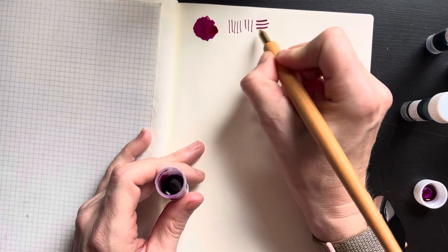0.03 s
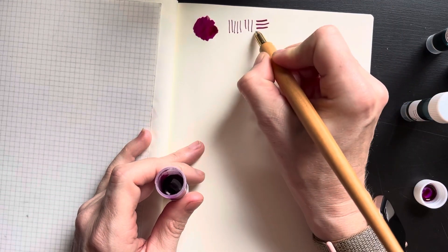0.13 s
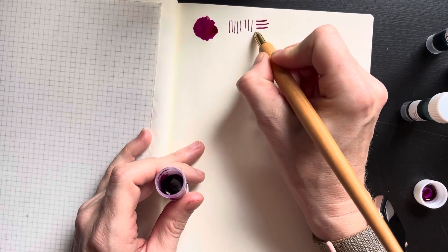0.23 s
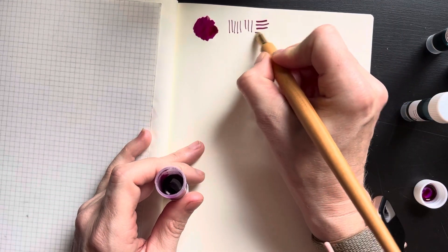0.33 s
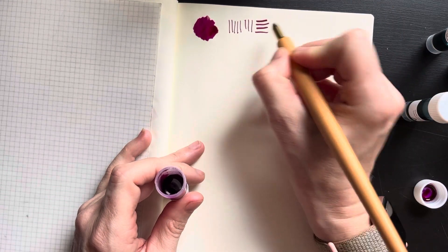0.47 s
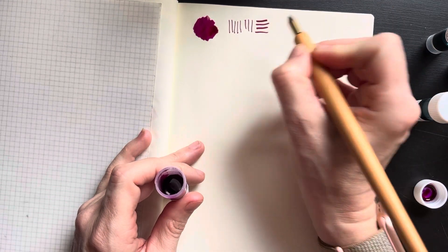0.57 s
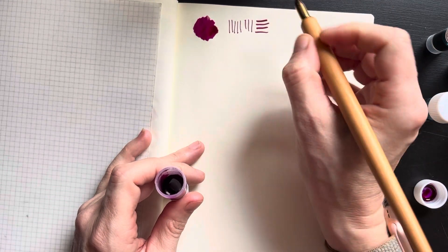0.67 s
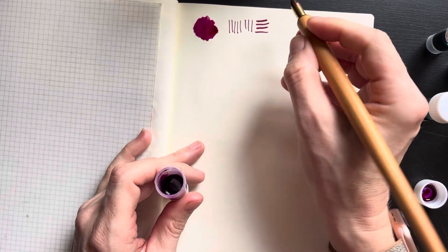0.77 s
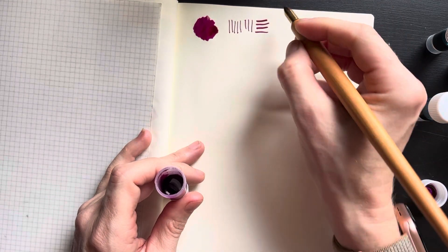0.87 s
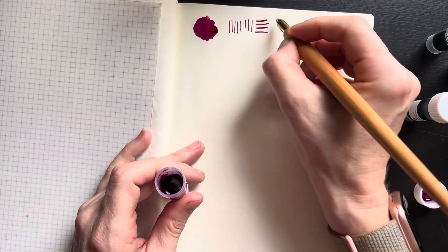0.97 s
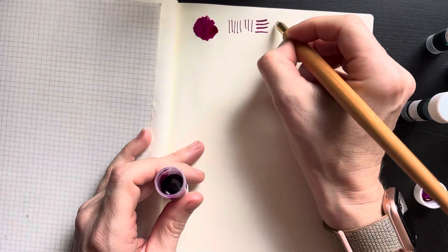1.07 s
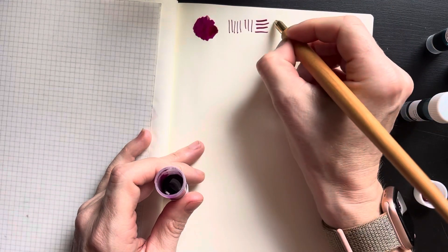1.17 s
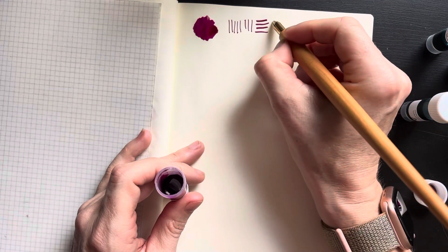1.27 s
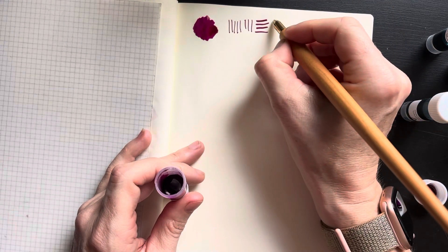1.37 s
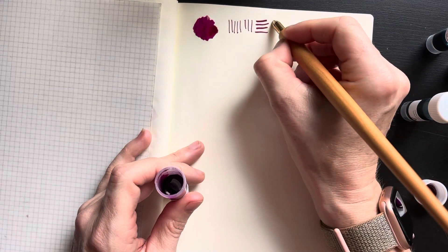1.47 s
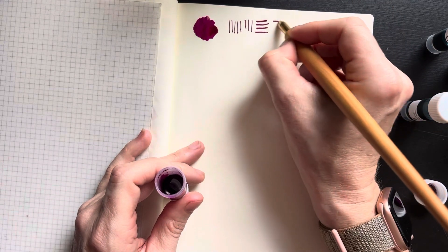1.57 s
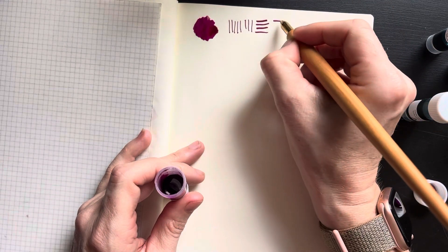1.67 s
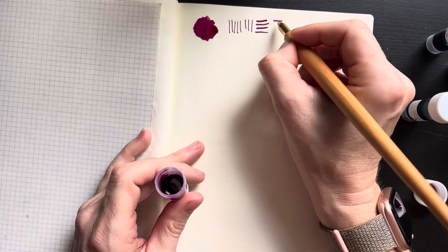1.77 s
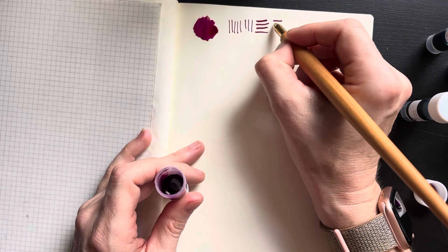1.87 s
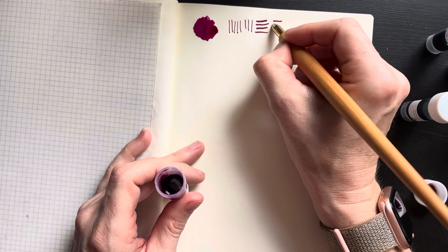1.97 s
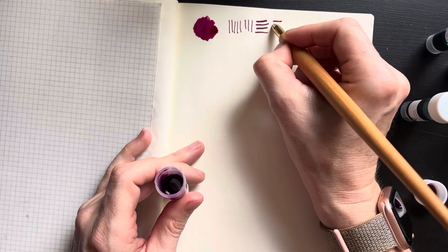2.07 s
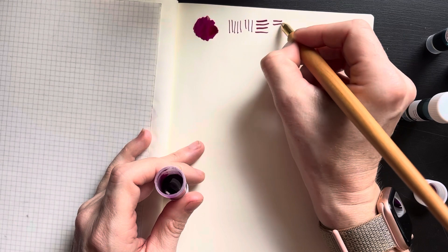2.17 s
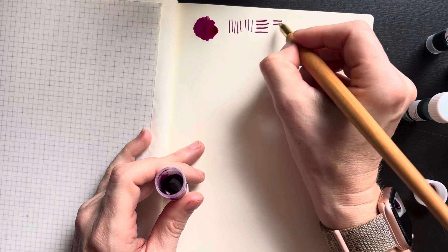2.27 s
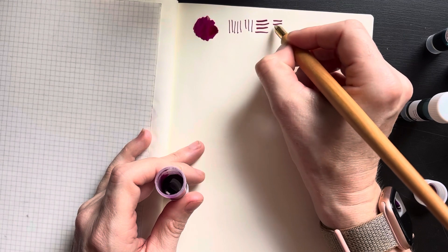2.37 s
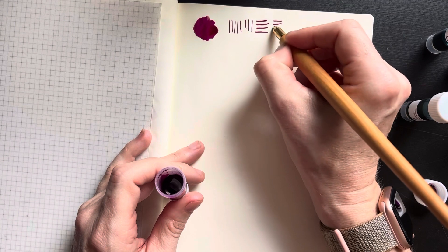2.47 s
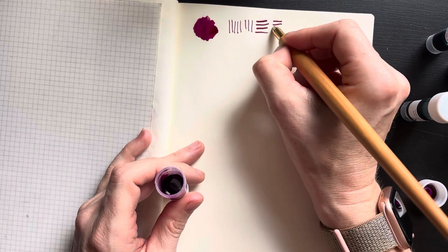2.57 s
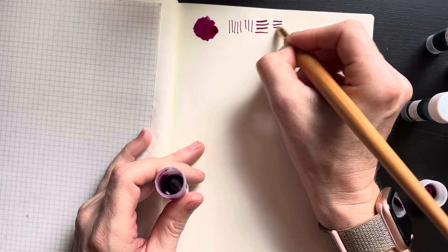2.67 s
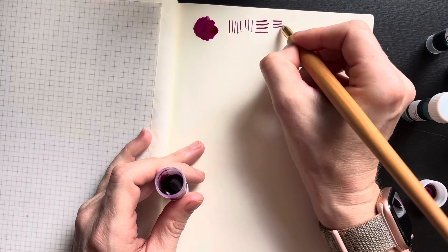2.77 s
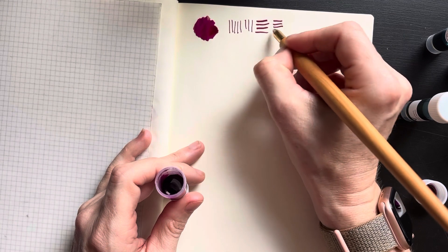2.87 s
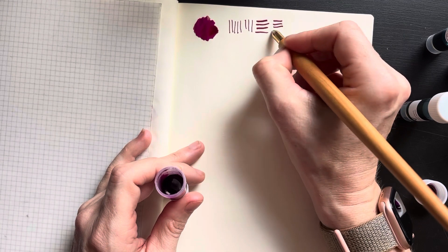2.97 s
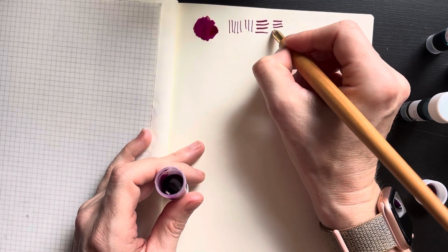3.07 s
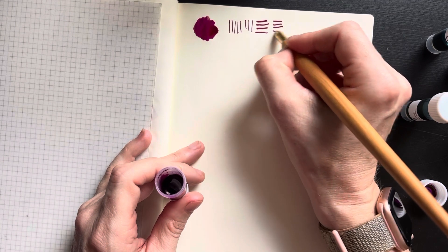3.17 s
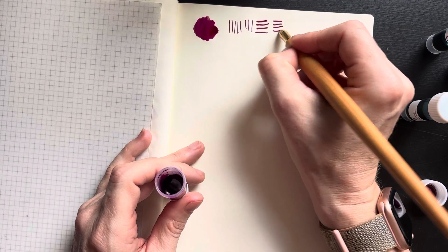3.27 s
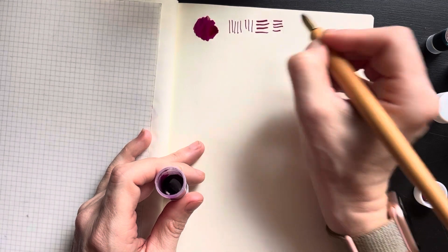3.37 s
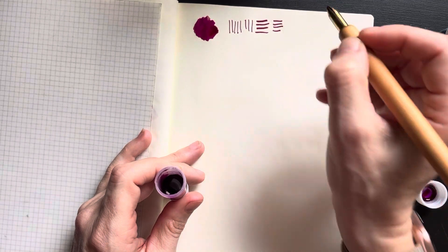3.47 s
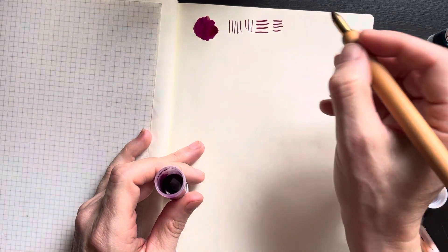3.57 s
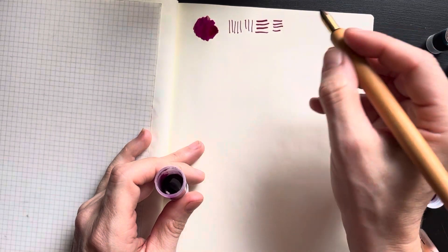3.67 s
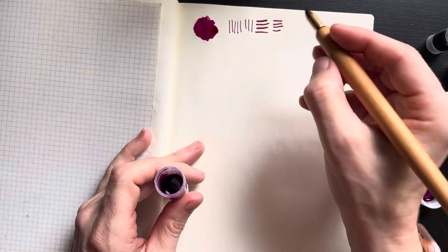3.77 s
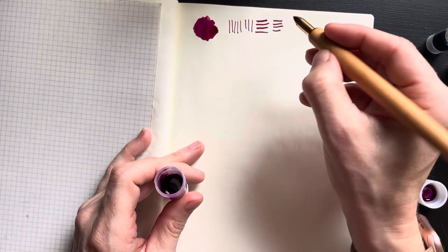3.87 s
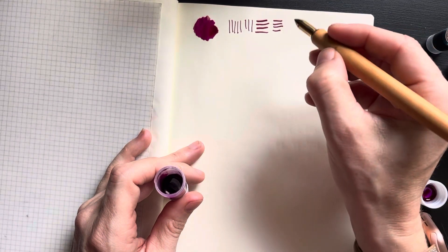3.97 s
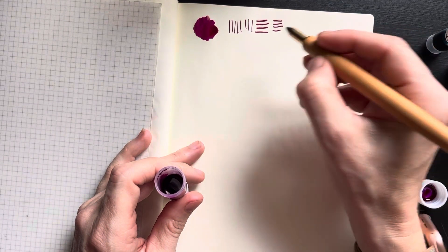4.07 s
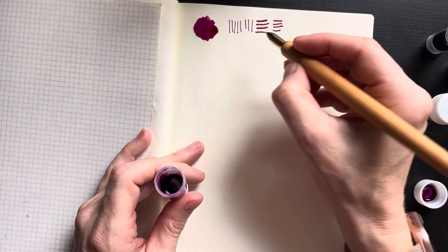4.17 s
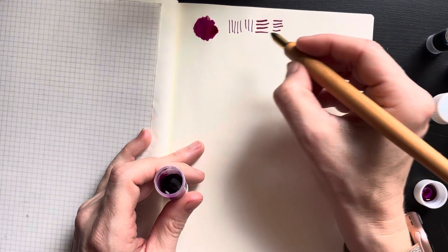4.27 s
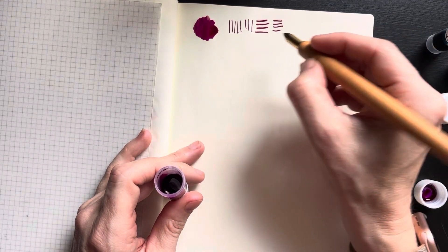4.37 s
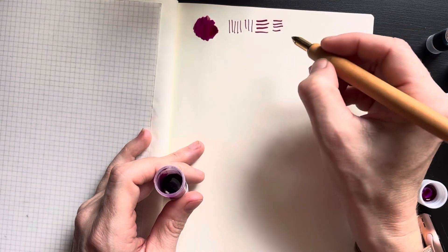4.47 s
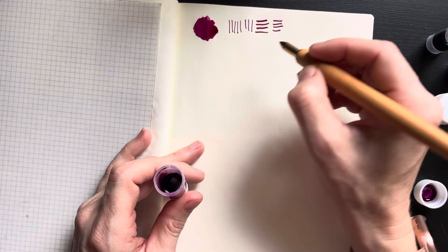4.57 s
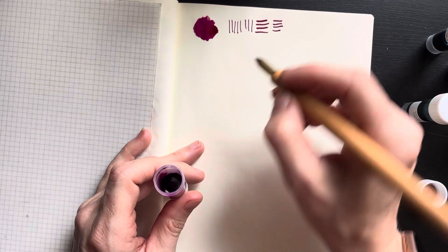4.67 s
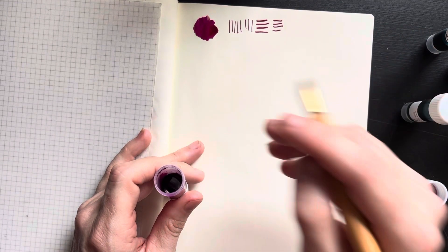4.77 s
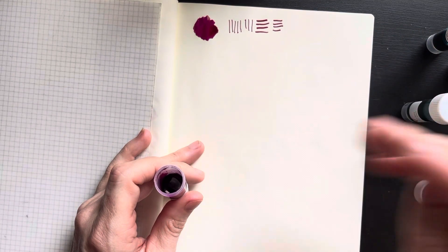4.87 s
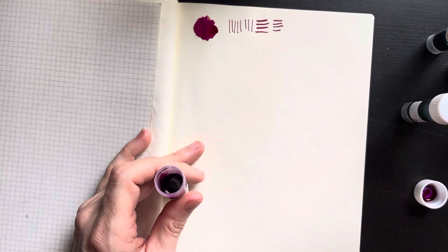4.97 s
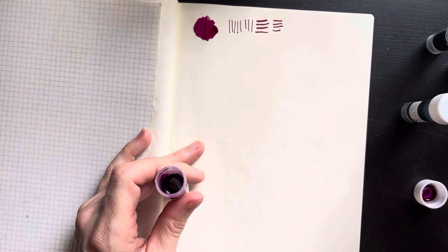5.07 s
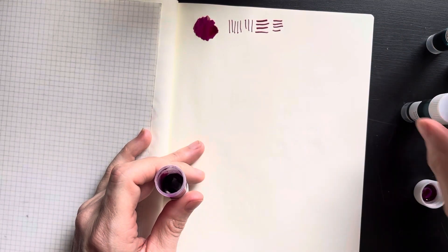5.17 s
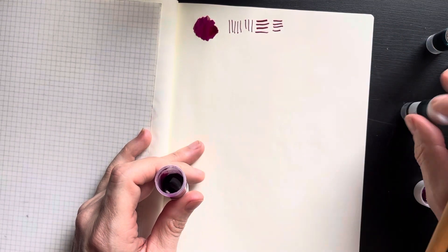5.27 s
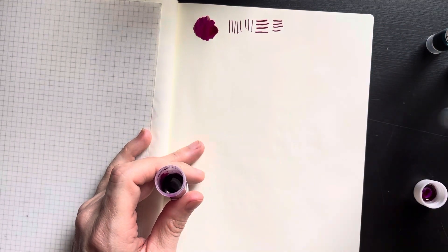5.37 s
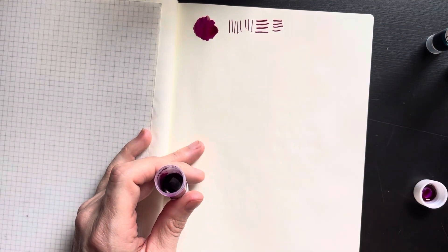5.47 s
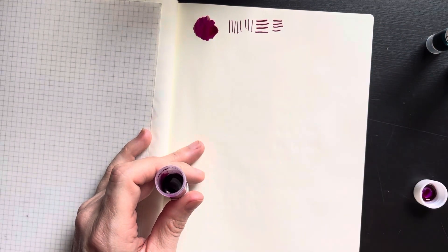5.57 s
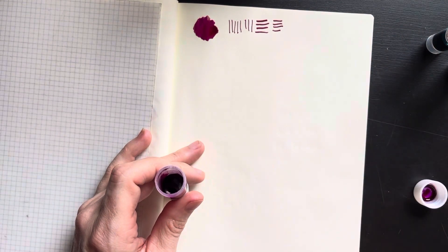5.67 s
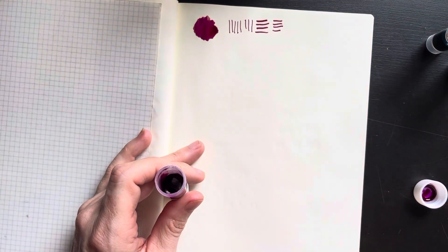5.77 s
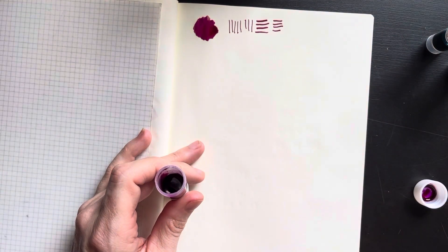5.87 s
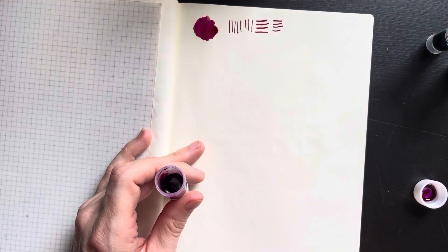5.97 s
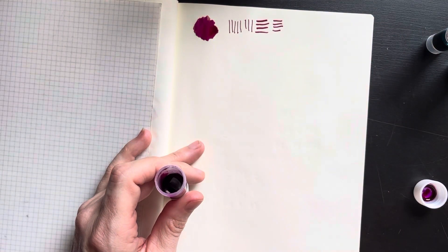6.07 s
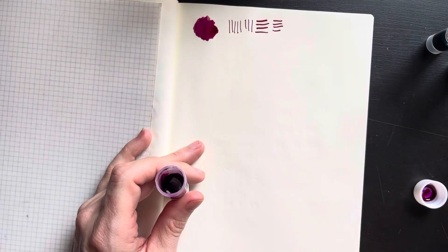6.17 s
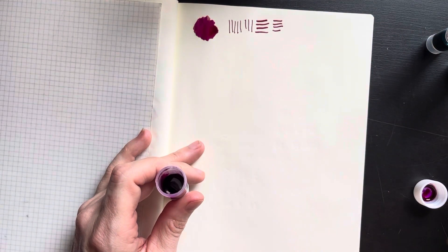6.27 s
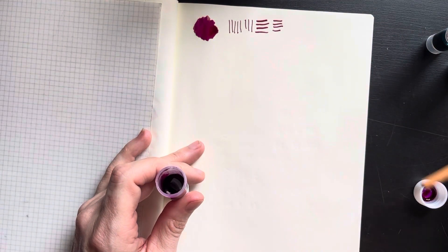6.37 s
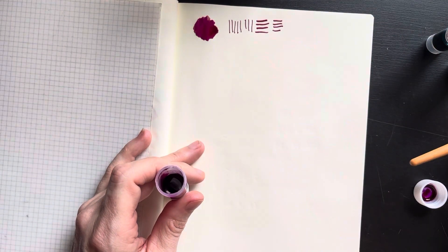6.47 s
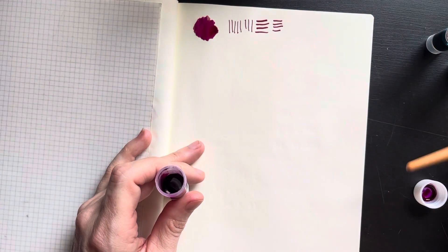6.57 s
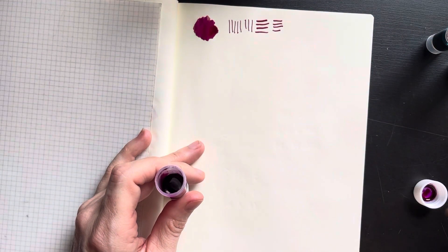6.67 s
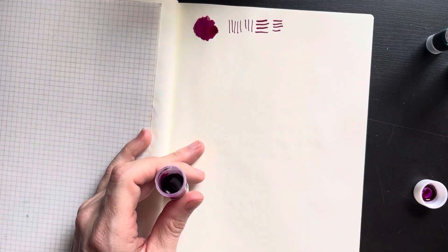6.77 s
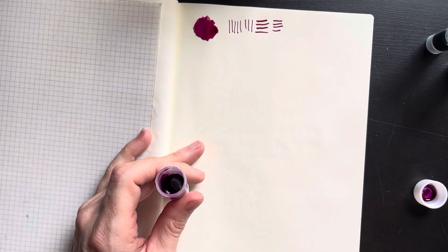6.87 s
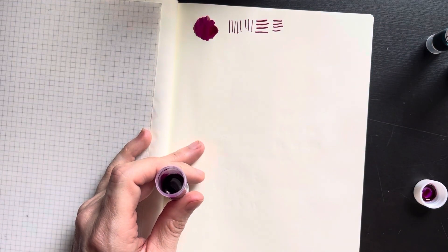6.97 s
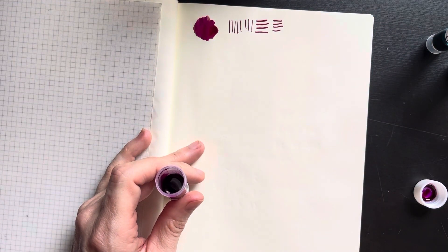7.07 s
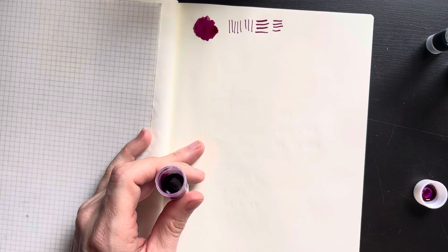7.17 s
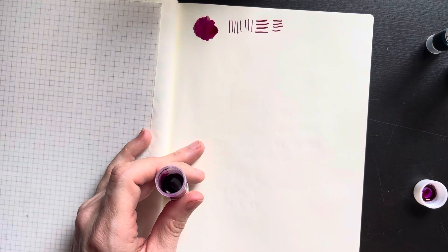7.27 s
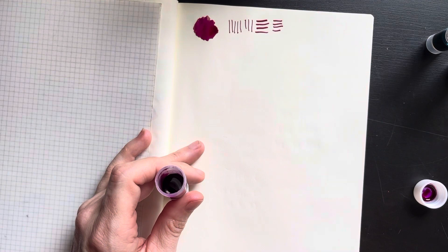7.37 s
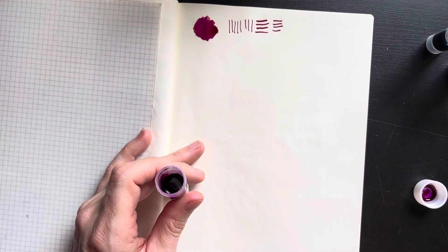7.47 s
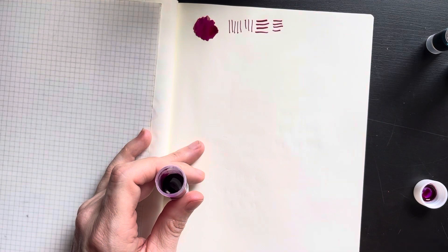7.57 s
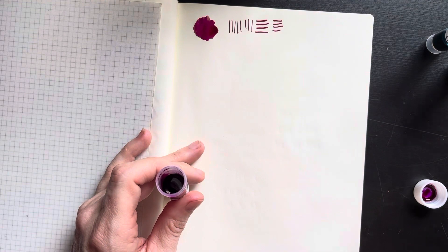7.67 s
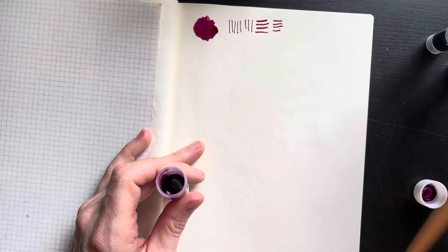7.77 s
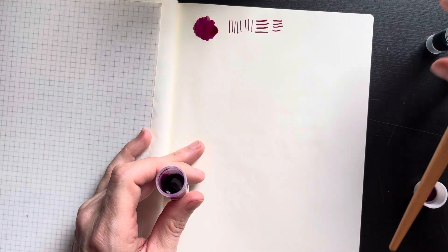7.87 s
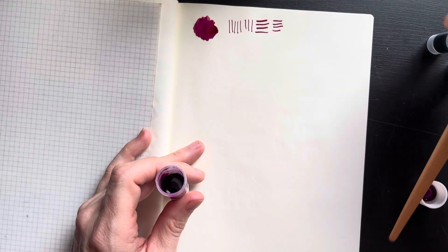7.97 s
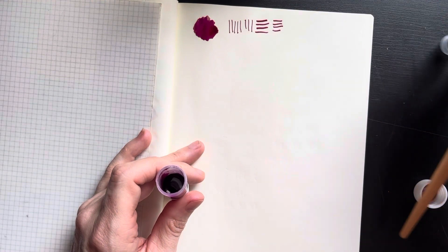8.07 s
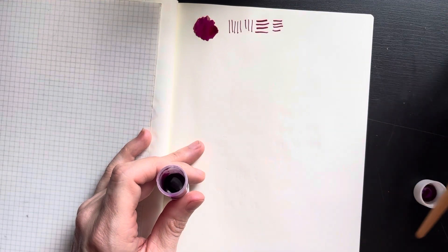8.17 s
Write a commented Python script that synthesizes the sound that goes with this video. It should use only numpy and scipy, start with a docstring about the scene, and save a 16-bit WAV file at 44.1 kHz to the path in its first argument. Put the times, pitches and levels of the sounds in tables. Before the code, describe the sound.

Quick ringing nib scratches on a notebook page, a hand brushing paper, then desk knocks, a juddering slide and light clatter in a quiet room.

```python
"""A steel dip pen draws five quick short lines in a notebook on a wooden desk, in a small quiet room.
Paper fibres pluck its ringing nib; after the first stroke and after the last the hand hisses over the page.
Soft bumps and light clicks come mostly after the writing; things scrape, a small ink bottle lands and wobbles to rest.
Something slides with a gliding judder, a round thing rocks in fading nudges, and the pen clatters on the desk.
Low rumble and faint airy hiss run throughout; short room reflections follow every other sound."""
import sys
import numpy as np
from scipy import signal
from scipy.fft import rfft, irfft, next_fast_len
from scipy.io import wavfile

SR = 44100
rng = np.random.default_rng(int(sys.argv[2]) if len(sys.argv) > 2 else 0)


def waveform_to_disk(signal):
    """Save audio, clipped to [-1, 1], as 16-bit WAV at the path in sys.argv[1]."""
    frames = np.transpose(np.atleast_2d(signal))
    scaled = np.clip(frames, -1, 1) * 32767
    samples = np.round(scaled).astype(np.int16)
    wavfile.write(sys.argv[1], SR, samples)


N = 362218
TIME = np.arange(N) / SR  # s
BLOW = TIME[:SR // 5]  # time within one blow, s


def from_db(db):
    """Turn decibels into gain."""
    return 10 ** (np.asarray(db) / 20)


def rms_one(x):
    """Scale to unit power."""
    return x / np.sqrt(np.mean(x ** 2) + 1e-30)


def blow_one(x):
    """Scale a blow to unit power over its first 20 ms."""
    return x / np.sqrt(np.mean(x[..., :SR // 50] ** 2) + 1e-30)


def at_hz(points, hz):
    """Read a table at any frequency, on a log-frequency axis."""
    known_hz, values = np.transpose(points)
    return np.interp(np.log(np.maximum(hz, 1)), np.log(known_hz), values)


def coloured(x, spectrum):
    """Shape a sound to a spectrum that falls away steeply past both ends; unit power."""
    length = x.shape[-1]
    size = next_fast_len(length)
    hz = np.fft.rfftfreq(size, 1 / SR) + 1
    ends = np.minimum(1, np.minimum(hz / spectrum[0][0], spectrum[-1][0] / hz)) ** 4
    shaped = irfft(rfft(x, size) * from_db(at_hz(spectrum, hz)) * ends, size)
    return rms_one(shaped[..., :length])


def resonate(x, modes):
    """Ring several resonances side by side, with alternating sign."""
    out = 0
    for k, (hz, width, db) in enumerate(modes):
        r = np.exp(-np.pi * width / SR)  # a wider resonance dies sooner
        poles = [1, -2 * r * np.cos(2 * np.pi * hz / SR), r * r]
        ring = (1 - r * r) / 2 * signal.lfilter([1, 0, -1], poles, x)
        out = out + (-1) ** k * from_db(db) * ring
    return out


def grains(per_s, spread_db):
    """Tiny catches of rubbing surfaces: clicks at random times, of uneven size and random sign."""
    sizes = from_db(spread_db * np.minimum(rng.exponential(1, N), 4))
    signs = rng.choice([-1, 1], N)
    present = rng.random(N) < per_s / SR
    return sizes * signs * present + 1e-18


def flutter(depth_db, top_hz):
    """Make a gain of unit power that wavers at random, as grip comes and goes."""
    wobble = coloured(rng.standard_normal(N), [(12, 0), (top_hz, -8)])
    return rms_one(from_db(depth_db * np.clip(wobble, -2, 2)))


def gestures(rows, column, rise, late_s=0):
    """Level of sliding motions that speed up and slow down in a lopsided bell shape."""
    level = np.zeros(N)
    for row in rows:
        s, length = row[:2]
        near = slice(max(0, int((s - 4 * length) * SR)), int((s + 4 * length) * SR))
        t = TIME[near] - s - late_s
        spread = length * np.where(t < 0, rise, 1 - rise)
        level[near] += from_db(row[column]) * np.exp(-.5 * (t / spread) ** 2)
    return level


def add(track, s, sound):
    """Mix a sound in at a time."""
    start = round(s * SR)
    part = sound[..., :N - start]
    track[..., start:start + part.shape[-1]] += part


def dying_run(start_s, first_gap_s, shrink, count):
    """Times of touches whose gaps shrink by a fixed share."""
    gaps = first_gap_s * shrink ** np.arange(count - 1)
    return start_s + np.append(0, np.cumsum(gaps))


# spectrum of the building's rumble: [f/Hz, level/dB per Hz]
RUMBLE_SPECTRUM = [(15, -37), (25, -11), (40, -5), (58, -2), (72, -3), (86, -21), (101, -7.5), (119, -8.5),
                   (134, -7.5), (171, -30.5), (186, -16), (204, -17), (259, -15.5), (332, -34.5),
                   (420, -38), (550, -58.5), (920, -120)]
# spectrum of the airy hiss: [f/Hz, level/dB per Hz]
AIR_SPECTRUM = [(200, -7), (350, 10.5), (480, 11), (700, -2.5), (1000, -5.5), (1400, -2.5), (2000, -10),
                (4500, -15.5), (8000, -17.5), (12000, -25), (16000, -30.5)]
RUMBLE_DB, AIR_DB = -59.5, -78


def background():
    """The low rumble of the building, nearly alike on both sides, and a faint airy hiss."""
    shared = coloured(rng.standard_normal(N), RUMBLE_SPECTRUM)
    difference = coloured(rng.standard_normal(N), RUMBLE_SPECTRUM) * [[1], [-1]]
    rumble = shared + from_db(-18.5) * difference
    air = coloured(rng.standard_normal((2, N)) + .5 * rng.standard_normal(N), AIR_SPECTRUM)
    return from_db(RUMBLE_DB) * rumble + from_db(AIR_DB) * air


# pen strokes: [t/s of top speed, length/s of the bell, nib level/dB, page drum level/dB]
PEN_STROKES = [(0.381, 0.035, -53.5, -47.5), (1.572, 0.046, -63.5, -55.5), (2.105, 0.036, -65, -55),
               (2.661, 0.039, -63.5, -52), (3.168, 0.031, -63, -50)]
# resonances of the steel nib: [f/Hz, width/Hz, level/dB]
NIB_RESONANCES = [(1040, 137, -0.5), (1350, 48, -2), (1800, 330, -14), (2360, 143, -1.5), (4027, 214, -1.5),
                  (6430, 57, 2.5), (7500, 530, -12), (9100, 250, -15), (11720, 160, -11)]
# hiss of the paper fibres: [f/Hz, level/dB per Hz]
FIBRE_SPECTRUM = [(700, -13), (1500, 7), (3000, 1), (7000, -23), (10000, -8), (15500, 4)]
# the drumming page: [f/Hz, level/dB per Hz]
PAGE_SPECTRUM = [(90, -7), (180, -16), (260, 4.5), (340, -7.5), (450, -12), (720, -14.5), (900, -35),
                 (1500, -34), (3000, -70)]
STROKE_RISE = 0.43  # share of the bell spent speeding up
FIBRE_DB = -10  # fibre hiss against the ring of the nib


def nib():
    """Fibres pluck the steel tines; the page drums underneath, its swell a little late."""
    catches = grains(per_s=6000, spread_db=2.0) * flutter(depth_db=-1.5, top_hz=255)
    page = coloured(catches, PAGE_SPECTRUM)
    # the tines bite harder each time the page springs up
    plucks = catches * from_db(1.5 * np.clip(page, -2, 2))
    hiss = from_db(FIBRE_DB) * coloured(plucks, FIBRE_SPECTRUM)
    ring = rms_one(resonate(plucks, NIB_RESONANCES))
    nib_level = gestures(PEN_STROKES, -2, STROKE_RISE)
    page_level = gestures(PEN_STROKES, -1, STROKE_RISE, late_s=0.0077)
    return (hiss + ring) * nib_level + page * page_level


# low resonances of the desk top: [f/Hz, width/Hz, level/dB]
DESK_LOW = [(119, 58, -12.5), (257.4, 34, -1), (290.7, 78, -3.5), (346, 55, -5), (482.5, 37, -2),
            (553, 47, -11), (645, 29, -12), (711, 48, -10.5)]
# high resonances of the desk top: [f/Hz, width/Hz, level/dB]
DESK_HIGH = [(904, 34, -11.5), (963.4, 18, 1), (1010, 94, -3), (1245, 84, -8.5), (1397, 78, 0.5),
             (1527, 120, -3), (1848, 210, -13), (2190, 160, -15.5), (2470, 68, -4.5), (2885, 360, -12)]


def desk(modes, travel_s, build_s, apart):
    """The struck desk top; bending waves are slower the lower they are, so low notes come later."""
    out = 0
    for k, (hz, width, db) in enumerate(modes):
        t = np.maximum(BLOW - travel_s * np.sqrt(modes[0][0] / hz), 0)
        # each blow stirs every resonance a little differently
        strength = width * from_db(db + 1.5 * rng.standard_normal())
        envelope = (1 - np.exp(-t / build_s)) * np.exp(-np.pi * width * t)
        # short waves meet the two microphones at different phases
        shift = min(apart * hz / 1000, np.pi / 4)
        phase = (-1) ** (k // 2) * np.array([[1], [-1]]) * shift
        out = out + (-1) ** k * strength * envelope * np.sin(2 * np.pi * hz * t + phase)
    return blow_one(out)


def snap(spectrum, rise_s, decay_s, after_db, after_s):
    """A sharp contact: a short burst, then fainter scatter from nearby surfaces."""
    fall = np.exp(-BLOW / decay_s) + from_db(after_db) * np.exp(-BLOW / after_s)
    envelope = (1 - np.exp(-BLOW / rise_s)) * fall
    return coloured(rng.standard_normal(len(BLOW)), spectrum) * envelope


# rattle and chafing on the desk: [f/Hz, level/dB per Hz]
RATTLE_SPECTRUM = [(150, -14.5), (260, 0.5), (400, -2), (490, 4.5), (640, 0.5), (830, -0.5), (1000, 0),
                   (1400, -7.5), (1800, -22), (2700, -26.5), (3600, -30.5), (5200, -34), (8500, -42),
                   (13000, -45)]


def soft_contact(hz, clack_db, push_s):
    """A soft contact pushes slowly, so the wood answers mostly around one low pitch."""
    swell = BLOW / push_s
    thud = swell * np.exp(1 - swell) * np.sin(2 * np.pi * hz * BLOW)
    wood = desk(DESK_LOW[1:], travel_s=.0012, build_s=0.011, apart=0.35)
    clack = desk(DESK_HIGH, travel_s=0.000862, build_s=0.0032, apart=0.75)
    chafe = snap(RATTLE_SPECTRUM, rise_s=0.45 * push_s, decay_s=1.7 * push_s, after_db=-10.5, after_s=0.018)
    body = from_db(0.5) * thud + from_db(-10.0) * wood
    return body + from_db(clack_db - 13.0) * clack + from_db(clack_db + 8) * chafe


# soft bumps of handling, before soft_contact's trims: [t/s, level/dB, f/Hz, clack level/dB]
HANDLING_BUMPS = [(0.459, -49.5, 302, -69), (4.082, -45, 308, -76), (4.134, -44, 336, -73),
                  (4.18, -42, 449, -67), (4.492, -52, 350, -76), (5.257, -47.5, 515, -67.5),
                  (5.27, -37, 636, -50.5), (5.445, -44, 422, -61.5), (5.59, -44, 366, -64),
                  (6.066, -47, 470, -59), (6.18, -38, 326, -56), (6.282, -40.5, 301, -54.5),
                  (6.863, -53.5, 400, -66.5), (7.988, -39.5, 556, -61)]
PUSH_S = 0.003  # time the push takes to peak


def bumps():
    """Fingers and things in them bump the desk, each with a soft thud at its own pitch."""
    out = np.zeros((2, N))
    for s, db, hz, clack_db in HANDLING_BUMPS:
        add(out, s, from_db(db) * soft_contact(hz, clack_db - db, PUSH_S))
    return out


# the hand brushing the page, before the trims: [t/s of top speed, length/s, hiss level/dB, rasp level/dB]
HAND_BRUSHES = [(0.511, 0.06, -60, -66.5), (0.72, 0.22, -85, -95), (3.319, 0.028, -57.5, -62.5),
                (3.72, 0.44, -90, -102), (4.755, 0.09, -71, -75), (4.85, 0.075, -70.5, -86),
                (4.965, 0.035, -75, -92), (7.56, 0.12, -76.5, -84.5)]
# fine hiss of skin: [f/Hz, level/dB per Hz]
SKIN_HISS_SPECTRUM = [(3000, -16), (3800, -3), (4200, -10), (4700, -10), (6500, -6), (7600, -1.5),
                      (8700, 5), (10000, -12.5), (12000, 4.5), (13500, -10), (15500, -0.5)]
# lower rasp of pressed skin: [f/Hz, level/dB per Hz]
SKIN_RASP_SPECTRUM = [(100, -21), (280, 22.5), (450, 10), (800, -1.5), (2000, 1.5), (2800, -5.5), (4000, 1),
                      (5200, -5.5), (8000, -14)]
BRUSH_RISE = 0.26  # share of the bell spent speeding up


def hand():
    """Skin on paper: a fine hiss, with a lower rasp where it presses."""
    hiss = coloured(grains(per_s=7000, spread_db=0.5), SKIN_HISS_SPECTRUM)
    hiss = hiss * gestures(HAND_BRUSHES, -2, BRUSH_RISE)
    rasp = coloured(grains(per_s=4800, spread_db=1.0), SKIN_RASP_SPECTRUM)
    rasp = rasp * gestures(HAND_BRUSHES, -1, BRUSH_RISE)
    return (from_db(-1.5) * hiss + from_db(9.0) * rasp) * flutter(depth_db=2.5, top_hz=118)


# light clicks of small things in the hand, before the trims: [t/s, level/dB]
SMALL_CLICKS = [(3.2897, -57), (5.0838, -65.5), (5.441, -47), (6.071, -54.5), (6.109, -57), (6.626, -62),
                (6.969, -32), (7.9855, -60.5)]
# resonances of the small parts: [f/Hz, width/Hz, level/dB]
CLICK_RESONANCES = [(1220, 110, -6.5), (2000, 95, 0.5), (2410, 110, -0.5), (3145, 210, 5), (4145, 89, 5),
                    (7200, 170, 2)]
# the first snap of a click: [f/Hz, level/dB per Hz]
CLICK_SPECTRUM = [(800, 1.5), (2000, 0), (6000, 0), (11000, -2), (13500, -5.5), (16000, -15)]


def clicks():
    """Small hard parts snap together and ring briefly."""
    out = np.zeros(N)
    for s, db in SMALL_CLICKS:
        contact = snap(CLICK_SPECTRUM, rise_s=.0006, decay_s=.003, after_db=-17, after_s=.02)
        ring = blow_one(resonate(contact, CLICK_RESONANCES))
        add(out, s, from_db(db) * (from_db(-1.5) * contact + from_db(-13.5) * ring))
    return out


def scrape():
    """A dragged thing sticks and slips, sending uneven little jolts into the desk."""
    slips = grains(per_s=2100, spread_db=2.5)
    wood = rms_one(resonate(slips, DESK_LOW[1:] + DESK_HIGH))
    return from_db(-1.0) * coloured(slips, RATTLE_SPECTRUM) + from_db(-9.0) * wood


# things dragged a little way over the desk: [t/s of top speed, length/s of the bell, level/dB]
SHORT_DRAGS = [(5.277, 0.02, -50.5), (5.862, 0.0091, -28), (5.893, 0.029, -41), (6.838, 0.015, -65.5),
               (7.394, 0.026, -60.5), (8.02, 0.04, -66)]
DRAG_RISE = 0.46  # share of the bell spent speeding up


def drags():
    """Short stick-slip scrapes as things are shifted."""
    return scrape() * gestures(SHORT_DRAGS, -1, DRAG_RISE)


# the pen on the desk, before the trims: [t/s, crack level/dB, thump level/dB, clack level/dB]
PEN_CLATTER = [(7.2971, -39.5, -40.5, -56), (7.3331, -49, -42, -54.5), (7.3644, -45.5, -30.5, -30),
               (7.3824, -65, -43, -35)]
# sharp crack of a hard landing: [f/Hz, level/dB per Hz]
CRACK_SPECTRUM = [(2500, -25.5), (4200, -16.5), (5300, 6), (6200, 2.5), (7200, 1), (8700, -0.5),
                  (12000, -5.5), (14000, -12), (16000, -20)]
# duller rap of the thing that lands: [f/Hz, level/dB per Hz]
RAP_SPECTRUM = [(1200, -9.5), (1800, 8.5), (2300, 3), (2800, 4), (3500, -2.5), (4300, -12.5), (5200, -14),
                (6500, -22)]
# the bottle: each rebound comes sooner and weaker; TOUCHES includes the landing
LANDING_S, FIRST_REBOUND_S, REBOUND_SHRINK, TOUCHES = 5.6406, 0.105, 0.615, 7
# crack, thump, clack, rap: level/dB at the landing (before the trims) and loss/dB per rebound
LANDING_DB = (-17, -17.5, -21, -34.5)
REBOUND_LOSS_DB = (5, 3.5, 3.6, 2.8)
PEN_RAP_DB = -4  # rap of the wooden holder against the thump, before the trims


def knocks():
    """Each hard landing cracks in the air, sets the desk ringing and shakes what lies on it."""
    landings = []
    for k, s in enumerate(dying_run(LANDING_S, FIRST_REBOUND_S, REBOUND_SHRINK, TOUCHES)):
        landings.append((s, *(np.array(LANDING_DB) - k * np.array(REBOUND_LOSS_DB))))
    for s, crack_db, thump_db, clack_db in PEN_CLATTER:
        landings.append((s, crack_db, thump_db, clack_db, thump_db + PEN_RAP_DB))
    out = np.zeros((2, N))
    for s, crack_db, thump_db, clack_db, rap_db in landings:
        crack = snap(CRACK_SPECTRUM, rise_s=0.000067, decay_s=0.00062, after_db=-12, after_s=0.0037)
        rap = snap(RAP_SPECTRUM, rise_s=0.003, decay_s=0.0028, after_db=-14.5, after_s=0.021)
        thump = desk(DESK_LOW, travel_s=0.0041, build_s=0.0031, apart=0.56)
        clack = desk(DESK_HIGH, travel_s=.003, build_s=0.0021, apart=0.9)
        rattle = snap(RATTLE_SPECTRUM, rise_s=0.0021, decay_s=0.013, after_db=-18.5, after_s=0.056)
        add(out, s + .0021, from_db(crack_db) * crack)
        add(out, s + .001, from_db(rap_db + 11.0) * rap)
        add(out, s, from_db(thump_db - 1.0) * thump)
        add(out, s, from_db(clack_db - 4.5) * clack)
        add(out, s + .003, from_db(clack_db - 1.5) * rattle)
    return out


# judder rate of one slide in two pushes, before its flutter: [t/s, f/Hz (slips per s)]
JUDDER_RATE = [(6.365, 610), (6.388, 273), (6.42, 325), (6.452, 380), (6.47, 530), (6.495, 600),
               (6.52, 490), (6.55, 261)]
# how hard it bears on the desk, before the trims: [t/s, judder level/dB, scrape level/dB]
SLIDE_PRESSURE = [(6.345, -74, -81), (6.353, -70, -81), (6.369, -37.5, -54), (6.385, -41.5, -53.5),
                  (6.393, -35, -62), (6.421, -42.5, -69), (6.429, -55.5, -50), (6.469, -33, -57.5),
                  (6.491, -51, -56.5), (6.543, -46, -63.5), (6.57, -64, -76)]


def slide():
    """The long slide scrapes, rasps and hisses; slips in step make a low gliding judder."""
    s, *levels = np.transpose(SLIDE_PRESSURE)
    judder_gain, scrape_gain = (from_db(np.interp(TIME, s, db, left=-200, right=-200)) for db in levels)
    slips_per_s = np.interp(TIME, *np.transpose(JUDDER_RATE)) * flutter(depth_db=1.2, top_hz=300)
    # adding up the rate gives the turns of the gliding tone
    judder = np.sin(2 * np.pi * np.cumsum(slips_per_s) / SR) * flutter(depth_db=4.0, top_hz=200)
    catches = grains(per_s=3000, spread_db=1.0)
    rasp = from_db(-1.5) * coloured(catches, SKIN_RASP_SPECTRUM)
    hiss = from_db(-18) * coloured(catches, SKIN_HISS_SPECTRUM)
    friction = (from_db(4) * scrape() + rasp + hiss) * flutter(depth_db=2.5, top_hz=119)
    return from_db(1) * judder * judder_gain + friction * scrape_gain


# a round thing rocks to rest, before soft_contact's trims: [t/s of first nudge, level/dB, number of nudges]
ROCKING_RUNS = [(6.588, -43.5, 5), (7.453, -46.5, 4)]
# first swing; each later one is shorter and weaker
SWING_S, SWING_SHRINK, SWING_LOSS_DB = 0.049, 0.84, 2.16
# pitch, time for the push to peak, clack against the nudge before soft_contact's trims
ROCK_HZ, ROCK_PUSH_S, ROCK_CLACK_DB = 261, 0.0048, -33.5


def rocking():
    """A round thing nudges the desk at each swing until it settles."""
    out = np.zeros((2, N))
    for start_s, db, swings in ROCKING_RUNS:
        for k, s in enumerate(dying_run(start_s, SWING_S, SWING_SHRINK, swings)):
            nudge = soft_contact(ROCK_HZ, ROCK_CLACK_DB, ROCK_PUSH_S)
            add(out, s, from_db(db - k * SWING_LOSS_DB) * nudge)
    return out


# lead of the left microphone over the right: [f/Hz, lead/ms]
MICROPHONE_LEAD = [(300, -0.15), (550, -0.15), (780, -0.4), (1050, -0.09), (1600, -0.01), (2800, .165),
                   (3600, 0.084), (4900, 0.039), (5800, .083), (7000, .112), (10000, .146), (15000, .168)]


def microphones(x):
    """Two ports a few centimetres apart: airborne treble reaches the left one first."""
    size = next_fast_len(N)
    hz = np.fft.rfftfreq(size, 1 / SR)
    # half the lead goes to each side
    half_turn = np.exp(1j * np.pi * hz * at_hz(MICROPHONE_LEAD, hz) / 1000)
    return irfft(rfft(x, size) * np.array([half_turn, 1 / half_turn]), size)[:, :N]


# time for the room's reflections to fall by 60 dB: [f/Hz, decay/s]
ROOM_DECAY = [(150, 0.34), (400, 0.19), (1000, 0.19), (3000, 0.17), (8000, 0.15), (15000, 0.05)]


def room(x, first_s, alike_hz, dull_hz):
    """Diffuse reflections dying band by band; the bass is alike in both channels."""
    t = TIME[:SR // 2]
    hz = np.fft.rfftfreq(len(t), 1 / SR)
    mid, side = rfft(rng.standard_normal((2, len(t))))
    alike = 1 / (1 + (hz / alike_hz) ** 2)
    field = np.sqrt(1 + alike) * mid + np.sqrt(1 - alike) * side * [[1], [-1]]
    field = field / np.sqrt(1 + (hz / dull_hz) ** 2)
    edges = np.geomspace(60, 18000, 10)
    tail = 0
    for low, high in zip(edges, edges[1:]):
        t60 = at_hz(ROOM_DECAY, np.sqrt(low * high))
        band = irfft(field * ((hz >= low) & (hz < high)), len(t))
        tail = tail + band * np.exp(-np.log(1000) * t / t60)
    # silent up to first_s, then fading in over as long again
    tail = tail * np.clip(t / first_s - 1, 0, 1) / np.sqrt(SR / 30)
    return signal.fftconvolve(x[None], tail, axes=1)[:, :N]


def scene():
    """Writing, landings and handling, each sent to the room by its own share, over the background."""
    writing = nib() + hand()
    landings = knocks()
    handling = bumps() + rocking() + drags() + slide() + clicks()
    sent = from_db(-4) * writing + from_db(-7.5) * landings + from_db(-5.5) * handling
    reflections = room(np.mean(sent, axis=0), first_s=0.0019, alike_hz=450, dull_hz=5900)
    return microphones(writing + landings + handling) + reflections + background()


def record(dry):
    """The deepest bass is rolled off and the top is cut steeply."""
    bass_cut = signal.butter(8, 38, "high", fs=SR, output="sos")
    top_cut = signal.ellip(10, .2, 80, 15900, fs=SR, output="sos")
    return signal.sosfilt(top_cut, signal.sosfilt(bass_cut, dry))


dry = scene()
out = record(dry)
waveform_to_disk(out)
```